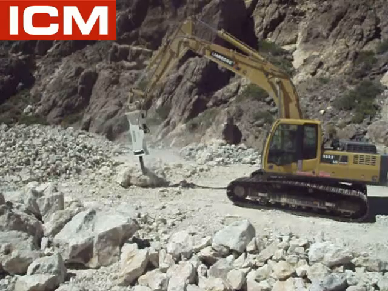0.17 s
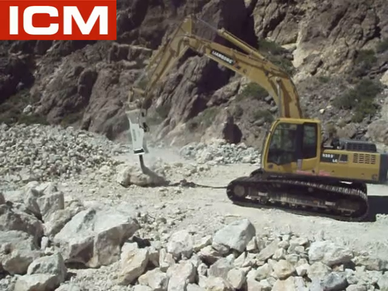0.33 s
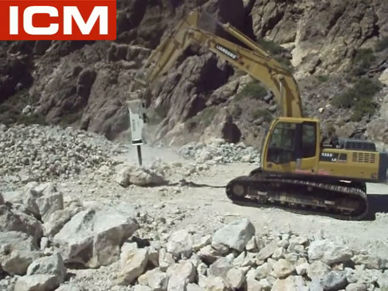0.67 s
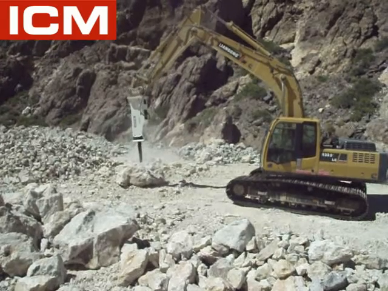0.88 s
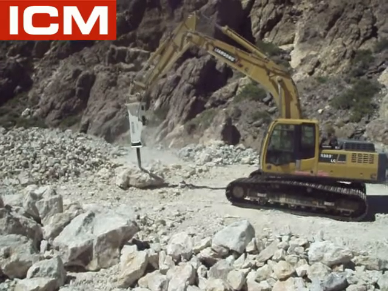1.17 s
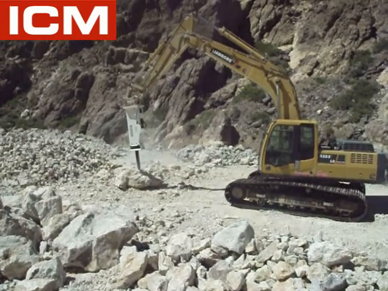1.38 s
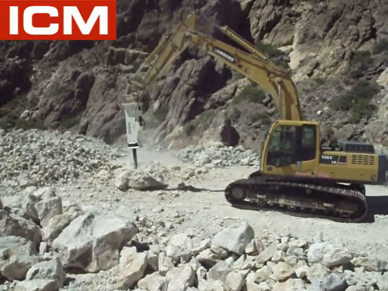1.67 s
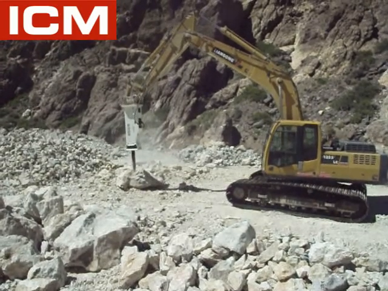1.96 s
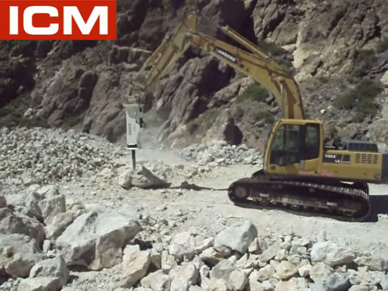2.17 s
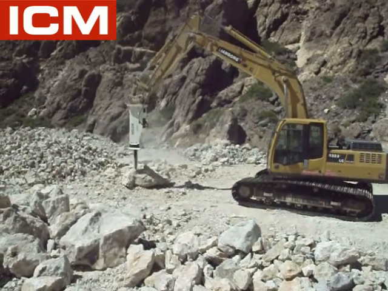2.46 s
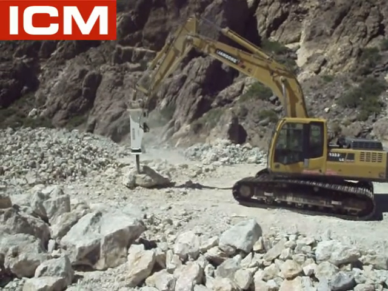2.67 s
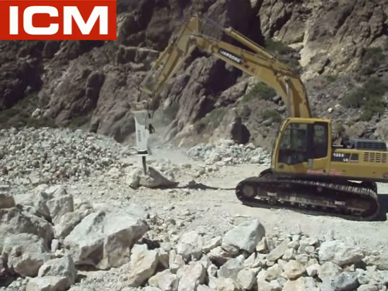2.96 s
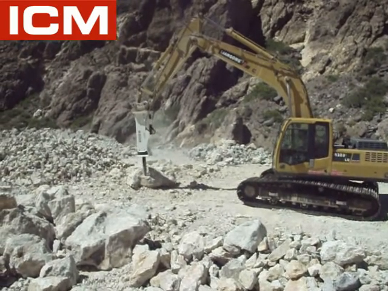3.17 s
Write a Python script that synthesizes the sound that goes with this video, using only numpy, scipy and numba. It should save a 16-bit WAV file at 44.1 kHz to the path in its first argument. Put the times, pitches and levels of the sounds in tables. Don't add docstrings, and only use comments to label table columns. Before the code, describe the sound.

Hard steel-on-rock blows ring and echo in an open quarry while a diesel engine drones and machinery clatters. Wind buffets overload a cheap camera microphone about twenty metres away, briefly ducking everything.

```python
import sys
import numpy as np
from scipy import signal
from scipy.io import wavfile
from scipy.ndimage import uniform_filter1d
from numba import njit

SR = 44100
rng = np.random.default_rng(int(sys.argv[2]) if len(sys.argv) > 2 else 0)


def magnitude_from_level(level_db):
    exponent = np.asarray(level_db, float) / 20
    return 10 ** exponent


def generate_wav(signal):
    frames = np.transpose(np.atleast_2d(signal))
    scaled = np.clip(frames, -1, 1) * 32767
    pcm = np.round(scaled).astype(np.int16)
    wavfile.write(sys.argv[1], SR, pcm)


N = 146853
LIMIT = 0.6
CHIP_HZ = 4730


def norm(x):
    return x / np.sqrt(np.mean(x ** 2))


def curve(table, col):
    a = np.array(table, float)
    return np.interp(np.arange(N) / SR, a[:, 0], a[:, col])


def band(x, hz, width):
    return signal.lfilter(*signal.iirpeak(hz, hz / width, fs=SR), x)


def low(x, hz, order):
    return signal.sosfilt(signal.butter(order, hz, fs=SR, output="sos"), x)


def walk(rate):
    hold = int(SR / rate)
    levels = np.repeat(rng.standard_normal(N // hold + 1), hold)
    return 1.3 * uniform_filter1d(uniform_filter1d(levels, hold), hold)[:N]


def colour(table, lo_hz, hi_hz, flicker_db, source):
    a, out = np.array(table, float), 0
    for hz in lo_hz * 2 ** np.arange(0, np.log2(hi_hz / lo_hz), 1 / 3):
        db = np.interp(np.log(hz), np.log(a[:, 0]), a[:, 1]) + flicker_db * walk(12)
        third_octave = band(band(source(), hz, hz / 3), hz, hz / 3)
        out = out + magnitude_from_level(db) * third_octave
    return norm(out)


def add(out, s, x):
    i = max(int(s * SR), 0)
    out[i:i + len(x)] += x[:N - i]


# t/s, firing rate f/Hz, drone level/dB
ENGINE = [(0, 75, -26), (.22, 84, -20), (.4, 71, -13), (.8, 80, -12), (.95, 86, -19), (1.34, 78, -24),
          (1.44, 82, -20), (1.94, 80, -21), (2.28, 84, -20), (2.54, 82, -15), (2.66, 80, -25),
          (2.79, 87, -15), (2.95, 82, -24), (3.33, 86, -24)]
# f/Hz, width f/Hz, level/dB
EXHAUST = [(169, 100, -2), (235, 25, -2.5), (287, 80, -11), (474.5, 2.4, -18.5), (567, 11, -7.5),
           (1129, 42, -10)]
# t/s, clatter level/dB, wind level/dB
EFFORT = [(0, -14.5, -23), (.2, -24.5, -19.5), (.45, -19, -15), (.8, -16.5, -16), (1.05, -16, -14.5),
          (1.15, -14.5, -15.5), (1.285, -20, -20.5), (1.31, -10.5, -20.5), (1.45, -17, -20.5),
          (1.7, -16, -11), (2.0, -17.5, -17.5), (2.3, -19, -14.5), (2.6, -16.5, -15), (2.7, -14.5, -19.5),
          (2.85, -17, -21.5), (2.93, -15, -14), (3.05, -17.5, -13.5), (3.33, -12, -12.5)]
# f/Hz, level per Hz/dB
CLATTER = [(300, 4), (420, -9.5), (650, -1), (930, -13), (1400, -10), (2100, -12.5), (2900, -6.5),
           (4200, -57.5)]


def engine():
    firing_jitter, firing_scatter_db, harmonics_db = .05, 1.5, -6
    ticks_per_s, tick_spread_db, tick_db = 340, 5.5, -9.5
    phase = np.cumsum(curve(ENGINE, 1) * (1 + firing_jitter * walk(40))) / SR
    pulses = np.diff(np.floor(phase), prepend=0) * magnitude_from_level(firing_scatter_db * walk(40))
    harmonics = np.zeros(N)
    for k, (hz, width, db) in enumerate(EXHAUST):
        harmonics += (-1) ** k * magnitude_from_level(db) * band(pulses, hz, width) / np.sqrt(width)
    drone = magnitude_from_level(harmonics_db) * norm(harmonics) + np.sqrt(2) * np.sin(2 * np.pi * phase)

    gate = 1 + .11 * np.cos(2 * np.pi * phase)
    strength_db = tick_spread_db * np.minimum(rng.exponential(size=N), 1.6)
    ticks = (rng.random(N) < ticks_per_s / SR) * magnitude_from_level(strength_db) * rng.choice([-1, 1], N)
    ticks = magnitude_from_level(tick_db) * norm(ticks)
    clatter = colour(CLATTER, 259, 6500, 2, lambda: gate * rng.standard_normal(N) + ticks)
    return drone * magnitude_from_level(curve(ENGINE, 2)) + clatter * magnitude_from_level(curve(EFFORT, 1) + 1)


# f/Hz, level per Hz/dB
WIND = [(15, 3), (40, 2), (110, -8.5), (280, -9), (420, -22.5), (700, -39)]
# t/s, level over the
# limit/dB, direction (sign)
BUFFETS = [(0.413, 8, -1), (0.625, 7, -1), (0.733, 8, -1), (0.787, 5, 1), (1.035, 9, 1), (1.184, 9, 1),
           (1.249, 6, -1), (1.432, 5, -1), (1.662, 9, -1), (1.869, 4, -1), (1.998, 12, 1), (2.082, 6, -1),
           (2.229, 15, -1), (2.351, 6, 1), (2.394, 6, -1), (2.506, 8, 1), (2.582, 5, -1), (2.799, 11, -1),
           (2.831, 5, -1), (2.867, 5, 1), (3.002, 5, 1), (3.179, 6, -1), (3.331, -1, 1)]


def wind():
    push_s, rebound_s, rebound_length_s, rebound = .0011, .02, .007, .05
    lead_s, buffet_db = .008, 3.5
    out = colour(WIND, 16.44, 600, 2, lambda: rng.standard_normal(N)) * magnitude_from_level(curve(EFFORT, 2) + 5)
    t = np.arange(-lead_s * SR, .05 * SR) / SR
    push = np.exp(-(t / push_s) ** 2 / 2)
    push = push - rebound * np.exp(-((t - rebound_s) / rebound_length_s) ** 2 / 2)
    for s, db, sign in BUFFETS:
        add(out, s - lead_s, np.sign(sign) * LIMIT * magnitude_from_level(db + buffet_db) * push)
    return out


# f/Hz, level/dB, t60/s, width f/Hz
BOOM = [(488.5, 0, 0.99, 36), (570, -1.5, 0.85, 88)]
# f/Hz, level/dB, t60/s, width f/Hz
STICK = [(1074, -2.5, 1, 74), (1482, -6.5, 0.34, 40), (2350, -11, 0.25, 34), (2620, -8.5, 0.21, 27),
         (2900, -5.5, .8, 27)]


def decay(t, t60):
    return np.exp(-np.log(1000) * t / t60)


def shake(modes, t):
    out = np.zeros(len(t))
    for hz, db, t60, width in modes:
        out += magnitude_from_level(db) * norm(band(rng.standard_normal(len(t)), hz, width)) * decay(t, t60)
    return out


def strike(t, hz, bright, ring_s):
    burst = rng.standard_normal(len(t)) * np.exp(-t / min(.027, 2.4 * ring_s))
    crack = low(band(burst, 3300, 2400) + band(burst, 1180, 1100), 3500, order=5)
    tick = band(band(burst, CHIP_HZ, 3000), CHIP_HZ, 3000) * np.exp(-t / .0013)
    ring = np.sin(2 * np.pi * hz * t) * np.exp(-t / ring_s)
    return (crack + .75 * bright * tick) / abs(crack).max() + magnitude_from_level(-3) * ring


def rock_echo(t, hz):
    body_db, chisel_db, t60 = -8, -8.5, 1.06
    noise = rng.standard_normal(len(t))
    wash = norm(band(noise, hz, 430))
    wash = wash + magnitude_from_level(body_db) * norm(band(noise, 1300, 2400))
    wash = wash + magnitude_from_level(chisel_db) * norm(band(noise, hz, 49))
    return low(wash, 3490, order=4) * decay(t, t60)


# t/s, peak level/dB, ring f/Hz, tick brightness (gain), ring time t/s
KNOCKS = [(.0084, 10, 2210, .6, 0.014), (0.1123, -6, 2686, 2.5, 0.0028), (.2184, -3.5, 2207, 1.6, 0.0013),
          (0.5089, -3.5, 2780, .1, 0.0044), (0.8442, -3.5, 2855, 1.2, 0.0041),
          (0.8506, -12, 2950, 3.8, 0.0027), (1.059, -4.5, 2164, 1.35, .006),
          (1.2147, 6.5, 2200, 3.2, 0.0047), (1.2927, 12.5, 2900, 1.7, 0.0052),
          (1.485, -2.5, 2906, 3.5, 0.0054), (1.5203, -0.5, 2570, 3.5, 0.0064),
          (1.5532, -3, 2570, 3.9, 0.0072), (2.6419, -1.5, 2970, 0.69, 0.0062),
          (2.6933, -3.5, 2535, 2, 0.0076), (2.818, -1.5, 2560, .6, 0.0061), (2.9112, 7, 2824, 1.5, .005),
          (3.036, -2, 3230, .6, .006)]
ECHO_DB = [-12, -22.5, -14.5, -18.5, -32.5, -39, -37.5, -23, -16.5, -17, -32.5, -33.5, -23, -37.5, -44.5,
           -18.5, -29]
BOOM_DB = [-18, -32.5, -33, -30.5, -39, -43.5, -30, -13.5, -28, -33.5, -21.5, -32.5, -13.5, -19, -36, -20.5,
           -24]
STICK_DB = [-19, -35, -32, -36.5, -36, -44.5, -29.5, -32, -16.5, -25.5, -28, -28, -21, -18, -32, -13, -18]


def knocks():
    out, t = np.zeros(N), np.arange(int(1.5 * SR)) / SR
    build_up = 1 - np.exp(-t / .0027)
    for knock, echo_db, boom_db, stick_db in zip(KNOCKS, ECHO_DB, BOOM_DB, STICK_DB):
        s, db, hz, bright, ring_s = knock
        hit = strike(t, hz, bright, ring_s)
        tail = rock_echo(t, hz) * magnitude_from_level(echo_db)
        tail = tail + shake(BOOM, t) * magnitude_from_level(boom_db) + shake(STICK, t) * magnitude_from_level(stick_db)
        add(out, s, magnitude_from_level(db) * hit / 2 + build_up * tail)
    return out


# t/s, peak level/dB
CHIPS = [(0.324, -31), (0.371, -36), (0.4544, -40), (0.5586, -34), (0.5728, -27), (0.6784, -27),
         (0.7078, -38), (0.728, -31), (0.7607, -35), (0.8699, -44), (0.9881, -42), (1.012, -33),
         (1.1019, -33), (1.1787, -32), (1.2208, -27), (1.2358, -17), (1.4082, -40), (1.5068, -21),
         (1.731, -36), (1.8178, -41), (1.8886, -33), (1.934, -34), (1.9865, -33), (1.999, -27),
         (2.222, -38), (2.325, -33), (2.383, -31.5), (2.3914, -32), (2.4243, -31), (2.4443, -46),
         (2.477, -38.5), (2.5695, -36), (2.6728, -34), (2.7394, -24.5), (2.7703, -25.5), (2.8289, -29),
         (2.8655, -33), (2.9477, -25), (3.0017, -26), (3.031, -33), (3.1425, -32)]


def chips():
    out, t = np.zeros(N), np.arange(600) / SR
    for s, db in CHIPS:
        chip = band(rng.standard_normal(600) * np.exp(-t / .0013), CHIP_HZ, 3500)
        add(out, s, magnitude_from_level(db + 17) * chip / abs(chip).max())
    return out


def scene():
    return (engine() + wind() + knocks() + chips())[None]


@njit
def limiter(x, key, top, release):
    y, e = np.empty(len(x)), top
    for i in range(len(x)):
        e = max(abs(key[i]), e + (top - e) * release)
        y[i] = x[i] * top / e
    return y


def drop_treble(x):
    keep_db, keep_from_hz = -77.5, 5150
    hz, _, z = signal.stft(x, SR, nperseg=4096, noverlap=2048)
    strong = uniform_filter1d(abs(z) ** 2, size=12, axis=0) > magnitude_from_level(2 * keep_db)
    edge = np.maximum((strong * hz[:, None]).max(axis=0), keep_from_hz)
    return signal.istft(z * (hz[:, None] <= edge), SR, nperseg=4096, noverlap=2048)[1][:N]


def top_cut(x):
    return signal.sosfilt(signal.butter(12, 20000, fs=SR, output="sos"), x)


def record(dry):
    sense_hz, sense_treble, sense_lag_s, release_s = 900, .9, .01, .012
    x = signal.lfilter(*signal.butter(1, 7.3, "high", fs=SR), dry[0])
    bass = signal.filtfilt(*signal.butter(2, sense_hz, fs=SR), x)
    treble = x - bass
    key = bass + sense_treble * np.roll(treble, int(sense_lag_s * SR))
    key = np.maximum(abs(key), abs(bass + treble / 2))
    x = limiter(x, key, LIMIT, 1 / (release_s * SR))
    x = low(x + .35 * band(x, 2700, 1400), 3432, order=3)
    x = x + magnitude_from_level(-52) * norm(band(rng.standard_normal(N), 4840, 3500))
    x = np.clip(x, -.8, .8)
    x = low(x, 6096, order=8)
    x = signal.sosfilt(signal.ellip(8, .2, 70, 6350, fs=SR, output="sos"), x)
    x = drop_treble(x)
    add(x, .0207, magnitude_from_level(-8) * np.hanning(4)[1:3])
    return top_cut(x[None])


dry = scene()
out = record(dry)
generate_wav(out)
```